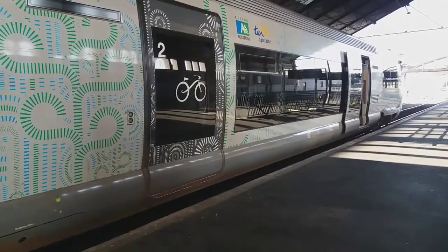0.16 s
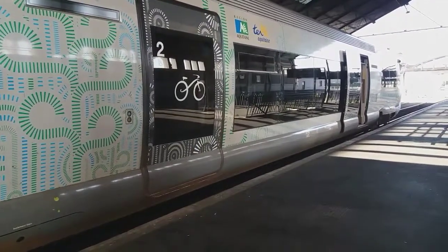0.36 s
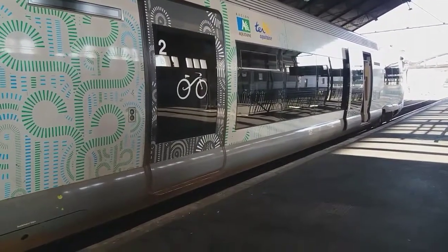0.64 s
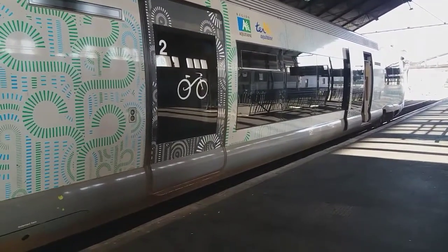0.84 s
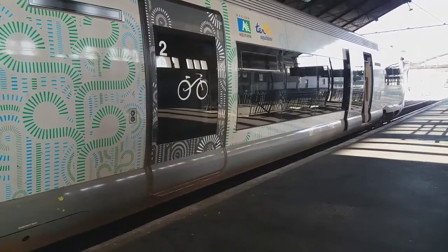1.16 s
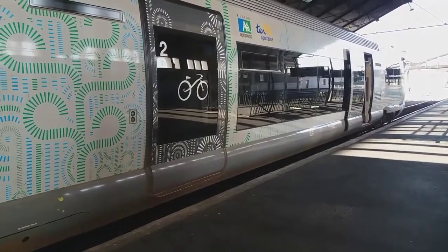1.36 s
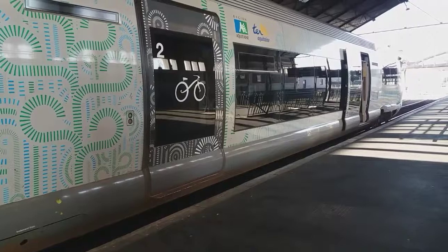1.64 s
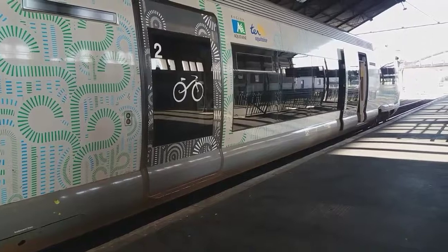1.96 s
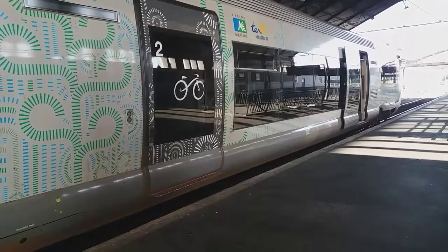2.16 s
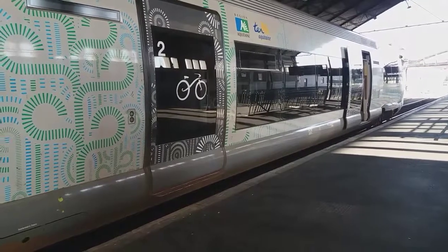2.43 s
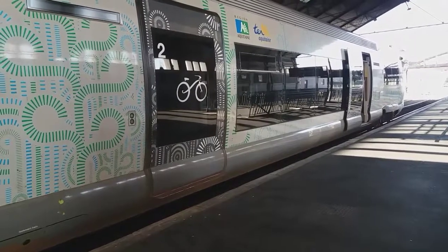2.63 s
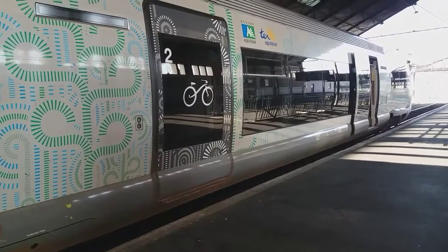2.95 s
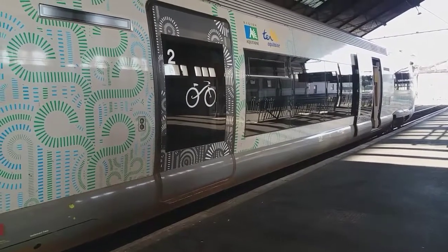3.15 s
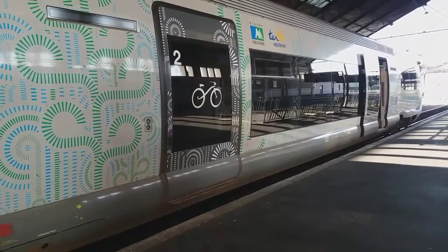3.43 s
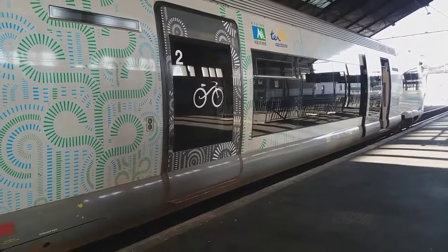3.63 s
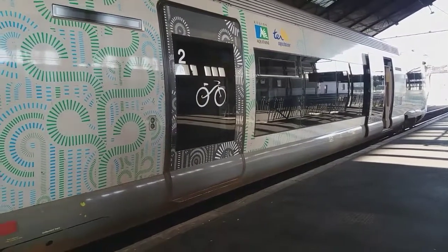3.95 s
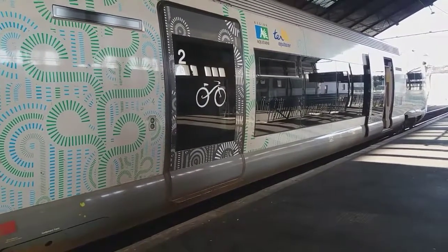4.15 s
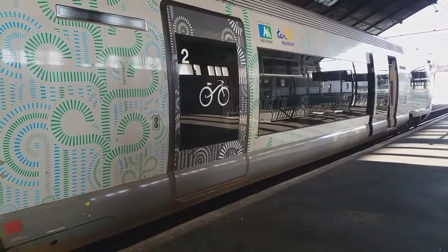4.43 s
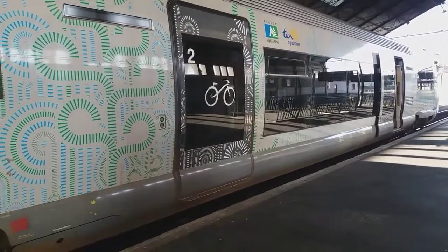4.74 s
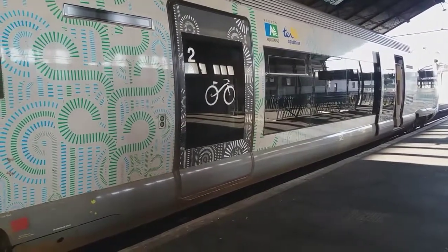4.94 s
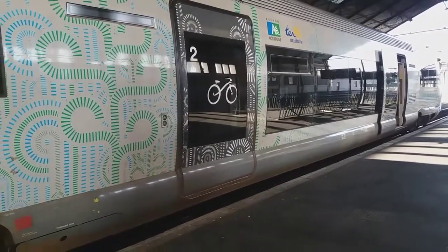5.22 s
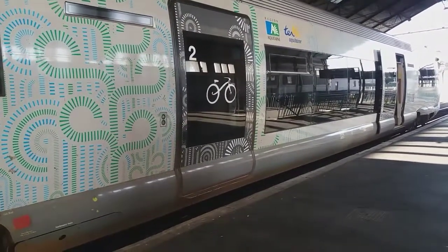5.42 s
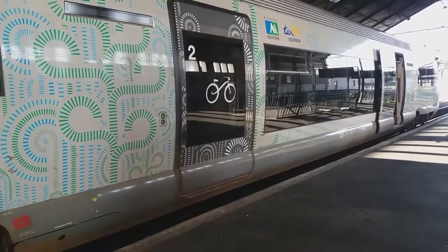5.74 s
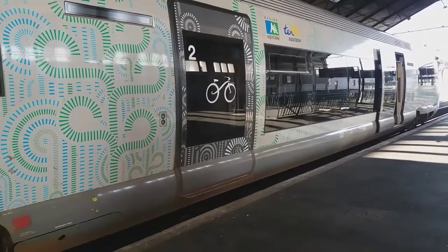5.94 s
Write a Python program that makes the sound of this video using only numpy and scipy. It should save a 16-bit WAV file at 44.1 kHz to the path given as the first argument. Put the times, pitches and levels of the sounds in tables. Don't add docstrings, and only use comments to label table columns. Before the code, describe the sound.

A knocking diesel drone fills a covered platform while gusts buffet the microphone; near four seconds couplings clank and one engine sags, swells and pulls.

```python
import sys
import numpy as np
from scipy import signal
from scipy.fft import rfft, irfft
from scipy.io import wavfile
from scipy.ndimage import uniform_filter1d, map_coordinates

SR = 44100
rng = np.random.default_rng(int(sys.argv[2]) if len(sys.argv) > 2 else 0)


def decibels_to_gain(level_db):
    exponent = np.asarray(level_db, float) / 20
    return 10 ** exponent


def unload_audio(sound):
    columns = np.transpose(np.atleast_2d(sound))
    steps = np.round(np.clip(columns, -1, 1) * 32767)
    wavfile.write(sys.argv[1], SR, steps.astype(np.int16))


N = 267728

# start_s, cycle_hz
PULL_CYCLE = [
    (0, 7.51),
    (3.75, 7.51),
    (4, 7.36),
    (4.2, 7.06),
    (4.5, 6.96),
    (5, 7.127),
    (5.4, 7.236),
    (6.07, 7.335),
]
# start_s, level_db
LOAD = [(3.3, -68), (3.5, -40.5), (3.88, -38), (3.97, -33.5), (4.0, -28.5), (4.06, -31), (4.09, -25),
        (4.16, -27.5), (4.22, -32), (4.32, -30.5), (4.48, -25.5), (4.7, -27), (5.3, -29), (6.07, -27.5)]
# multiple_of_cycle, level_db
PULL_ORDERS = [(9, -45), (12, -48), (15, -65), (18, -37), (33, -66), (42, -54), (48, -40), (56, -36.5),
               (62, -65), (70, -39), (104, -47.5), (105, -36), (109, -48), (111, -35.5), (124, -93),
               (126, -44), (135, -42), (144, -48.5), (149, -40)]
# pitch_hz, level_db (per Hz)
PULL_BLOCK = [(40, -9), (70, -5.5), (163, -8), (250, -11.5), (400, -8.5), (600, -7.5), (1080, -1),
              (1380, -10), (1650, -18.5), (2020, -14.5), (2440, -25.5), (3500, -32), (5000, -33.5),
              (5600, -43)]
CYLINDER_DB = np.array([0, -4, -10, -2, -6, -12])
# start_s (of the peak), level_db, half_length_s
COUGHS = [
    (3.8, -33.5, 0.26),
    (4.02, -29.5, 0.053),
    (4.18, -29, .05),
    (4.36, -28.5, 0.058),
    (4.6, -29, 0.075),
    (4.8, -28.5, 0.064),
    (5.15, -33.5, 0.14),
    (5.45, -35, 0.093),
    (6.07, -31, .08),
]
# start_s (of the peak), level_db, half_length_s
BOOMS = [
    (4.65, -29, 0.075),
    (4.97, -31.5, 0.17),
    (5.78, -36.5, 0.14),
    (6.07, -32.5, 0.17),
]
# start_s (of the peak), level_db, half_length_s
SLACK = [
    (3.7, -40, 0.16),
    (4.07, -28, 0.17),
    (4.26, -29, 0.075),
    (4.48, -36, .09),
    (4.7, -35, 0.099),
    (5.2, -33.5, 0.13),
    (5.95, -36, 0.15),
]
# pitch_hz, level_db
RATTLE = [(300, -8), (550, 13), (800, 5), (1200, -0.5), (1700, 1), (2000, -21), (3000, -14), (4000, -52)]
# start_s, level_db (peak), pitch_hz, ring_s
SLAPS = [
    (4.6278, -5, 210, .013),
    (4.6972, -7, 200, .013),
]
# start_s, level_db (peak), pitch_hz, ring_s
JOLTS = [
    (.745, -19.5, 154, 0.04),
    (.960, -18, 100, .04),
    (1.262, -17, 70, .05),
    (2.945, -15.5, 98.5, 0.033),
    (3.203, -12, 94, 0.015),
]
# start_s, level_db (peak), pitch_hz, ring_s
CLANKS = [
    (3.575, -36.5, 2600, .05),
    (3.956, -40, 2800, .06),
    (3.995, -32, 2530, .05),
    (3.995, -19, 1169, .1),
    (4.04, -18.5, 741, 0.093),
    (4.147, -32, 2590, 0.049),
]
# start_s (of the peak), level_db, half_length_s, top pitch_hz, rise_hz
GROAN = (3.5, -35.5, 0.03, 375, 45)
# multiple_of_cycle, level_db
IDLE_ORDERS = [(12, -44.6), (22, -37.6), (24, -44.5), (33, -50.2), (35, -52.0), (36, -51.9), (48, -53.2),
               (49, -51.1), (56, -46.4), (57, -52.5), (60, -53.4), (75, -50.4), (80, -52.6), (83, -53.6),
               (84, -51.0), (90, -51.4), (93, -53.2), (102, -45.6), (103, -49.3), (108, -48.5),
               (111, -47.8), (123, -52.6), (124, -51.1), (126, -53.2), (130, -48.5), (135, -51.4),
               (139, -50.9), (152, -54.2), (153, -53.0), (260, -58.8)]
# pitch_hz, level_db (per Hz)
BLOCK = [(40, -19), (70, -5.5), (150, -6), (230, -12), (500, -10), (800, -7.5), (1150, -10), (1550, -17.5),
         (2000, -15.5), (2350, -25.5), (3500, -39), (4300, -34), (5000, -43.5), (5600, -46)]
# pitch_hz, level_db
STEADY_TONES = [(184.4, -48), (294.5, -48), (68, -46), (1346, -57.5), (316, -54), (713, -54.5)]
# start_s (of the peak), level_db, half_length_s, flutter_db (relative to the gust)
GUSTS = [(0.033, -31, 0.026, -8), (0.284, -32, 0.035, -15), (0.382, -27.5, 0.02, -18),
         (.61, -29, 0.032, -9), (0.742, -32, .05, -6), (.965, -23, .03, -3.5), (1.08, -26, 0.064, -16),
         (1.158, -26.5, .03, -10), (1.226, -22, 0.021, -14), (1.279, -24, .03, -16),
         (2.274, -31.5, 0.055, -14), (2.47, -44, .06, -5), (2.64, -42, 0.036, -3), (2.935, -29, 0.067, -17),
         (3.11, -32, 0.044, -13), (3.202, -20, 0.015, -15), (3.62, -30, 0.03, -3.5), (3.937, -31, .07, -8),
         (4.17, -25, .03, -10), (4.25, -23.5, .05, -8), (4.445, -21, .025, -10), (4.505, -19, 0.027, -5),
         (4.744, -23.5, 0.18, -9.5), (4.903, -17.5, 0.044, -15), (5.08, -35, .03, -9),
         (5.405, -31, 0.054, -8), (5.593, -27.5, 0.048, -4), (5.818, -31.5, 0.11, -5)]


def pulling():
    cycle = np.cumsum(curve(PULL_CYCLE)[0]) / SR
    load_db = curve(LOAD)[0]
    knock = decibels_to_gain(0.5) * clatter(cycle, PULL_BLOCK, PULL_ORDERS, loose_db=2.2, knock_turns=0.39)
    orders = decibels_to_gain(24.5) * tones(cycle, PULL_ORDERS, waver_db=0.82)
    hiss = decibels_to_gain(-40) * band(rng.standard_normal(N), 5900, 18000)
    engine = decibels_to_gain(load_db) * (knock + orders + hiss)
    return engine + exhaust(cycle, load_db) + draw_gear(load_db)


def clatter(cycle, block, orders, loose_db, knock_turns):
    place = np.arange(1536) / 1536 * len(CYLINDER_DB)
    decay = np.exp(-(place % 1) / knock_turns)
    knock = 0.8 + decibels_to_gain(CYLINDER_DB[place.astype(int)]) * decay
    pattern = rfft(knock * rng.standard_normal(len(place)))
    pattern *= np.abs(pattern) ** -0.3
    pattern[[int(k) for k, db in orders]] = 0
    where = [cycle % 1 * len(place)]
    repeat = map_coordinates(irfft(pattern), where, order=3, mode="grid-wrap")
    swell = map_coordinates(knock, where, order=3, mode="grid-wrap")
    near = level(repeat, 0) + level(swell * rng.standard_normal(N), loose_db)
    return level(colour(roof(near, lag_s=0.015), block), 0)


def tones(phase, table, waver_db):
    out = np.zeros(N)
    for multiple, db in table:
        gain = decibels_to_gain(db + waver_db * walk(3.03)) * np.sqrt(2)
        out += gain * np.sin(2 * np.pi * (multiple * phase + rng.random()))
    return out


def exhaust(cycle, load_db):
    rough = decibels_to_gain(1.8 * walk(20)) * band(rng.standard_normal(N), 199, 460)
    rumble = swells(COUGHS, load_db - 8.5) * rough
    boom = swells(BOOMS, load_db - 16) * tones(cycle, [(36, 0)], waver_db=0.72)
    return rumble + boom


def draw_gear(load_db):
    rattle = level(colour(rng.standard_normal(N), RATTLE), 0)
    return swells(SLACK, load_db - 13.5) * decibels_to_gain(1.8 * walk(25)) * rattle


def blows(table, spread):
    out, t = np.zeros(N), np.arange(SR // 8) / SR
    for s, db, hz, ring_s in table:
        shape = np.sin(2 * np.pi * hz * t) + 0.5 * np.sin(2 * np.pi * hz * spread * t)
        shape *= np.exp(-np.log(1000) * t / ring_s / 2)
        start = int(s * SR)
        out[start:start + len(t)] -= decibels_to_gain(db) * shape / shape.max()
    return out


def clanks():
    out, t = np.zeros(N), np.arange(SR // 8) / SR
    for s, db, hz, ring_s in CLANKS:
        spread, turn = rng.standard_normal((2, 14, 1))
        shape = np.sin(2 * np.pi * (hz * (1 + 0.069 * spread) * t + turn)).sum(axis=0)
        attack = np.minimum(t / 0.0032, 1)
        shape *= np.exp(-np.log(1000) * t / ring_s / 2) * attack
        start = int(s * SR)
        out[start:start + len(t)] += decibels_to_gain(db) * shape / shape.max()
    return out


def groan():
    s, db, half_s, top_hz, rise_hz = GROAN
    late = np.clip((np.arange(N) / SR - s) / half_s + 1, -1, 9)
    pitch_hz = top_hz - rise_hz * np.exp(-late / 0.6)
    return swells([(s, db, half_s)], -90) * np.sqrt(2) * np.sin(2 * np.pi * np.cumsum(pitch_hz) / SR)


def idling():
    t = np.arange(N) / SR
    cycle = 7.505 * t + 0.0015 * walk(1.5)
    hiss = decibels_to_gain(-76) * band(rng.standard_normal(N), 5500, 20000)
    knock = decibels_to_gain(-34.5) * clatter(cycle, BLOCK, IDLE_ORDERS, loose_db=2.5, knock_turns=1.5)
    orders = decibels_to_gain(1) * tones(cycle, IDLE_ORDERS, waver_db=1)
    return knock + orders + tones(t, STEADY_TONES, waver_db=3.25) + hiss


def wind():
    breeze_db, breeze_flutter_db = -42.5, -16
    lumps = swells([(s, db, half_s) for s, db, half_s, up in GUSTS], breeze_db)
    flutter = swells([(s, db + up, half_s) for s, db, half_s, up in GUSTS], breeze_db + breeze_flutter_db)
    low = band(band(rng.standard_normal(N), 51.5, 179), 45, 195)
    high = band(rng.standard_normal(N), 190, 344)
    return low * lumps * decibels_to_gain(-4 + 0.42 * walk(30)) + high * flutter * decibels_to_gain(2 * walk(25))


def roof(x, lag_s):
    lag = lag_s * walk(SR / 1500)[:N // 2 + 1]
    return irfft(rfft(x) * np.exp(-2j * np.pi * np.cumsum(lag) * SR / N), N)


def swells(table, bed_db):
    t = np.arange(N) / SR
    power = decibels_to_gain(2 * bed_db) + np.zeros(N)
    for s, db, half_s in table:
        power += decibels_to_gain(2 * db) * np.exp(-2 * ((t - s) / half_s) ** 2)
    return np.sqrt(power)


def walk(rate_hz):
    hold = int(SR / rate_hz)
    steps = np.repeat(rng.standard_normal(N // hold + 1), hold)
    return 1.356 * uniform_filter1d(uniform_filter1d(steps, hold), hold)[:N]


def curve(table):
    s, *columns = np.transpose(table)
    return [np.interp(np.arange(N) / SR, s, c) for c in columns]


def colour(x, points):
    hz, db = np.transpose(points)
    bins_hz = np.arange(N // 2 + 1) * SR / N + 1
    gain_db = np.interp(np.log(bins_hz), np.log(hz), db, right=-80)
    return irfft(rfft(x) * decibels_to_gain(gain_db), N)


def band(x, lo_hz, hi_hz):
    sos = signal.butter(2, [lo_hz, hi_hz], "band", fs=SR, output="sos")
    return level(signal.sosfilt(sos, x), 0)


def level(x, db):
    return x * decibels_to_gain(db) / np.sqrt(np.mean(x ** 2))


def scene():
    drive_line = blows(SLAPS, spread=2.2) + blows(JOLTS, spread=1.6) + clanks() + groan()
    return (pulling() + drive_line + idling() + wind())[None]


def band_limit(x):
    return signal.sosfilt(signal.butter(12, 15720, fs=SR, output="sos"), x)


def record(dry):
    x = signal.sosfilt(signal.butter(4, 45, "high", fs=SR, output="sos"), dry[0])
    ratio = 47989.8 / SR
    held = np.floor(np.arange(N) * ratio) / ratio
    x = map_coordinates(x, [held], order=3, mode="nearest")
    return band_limit(x[None])


dry = scene()
out = record(dry)
unload_audio(out)
```